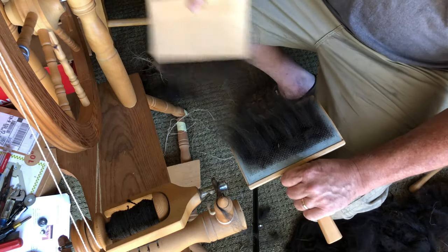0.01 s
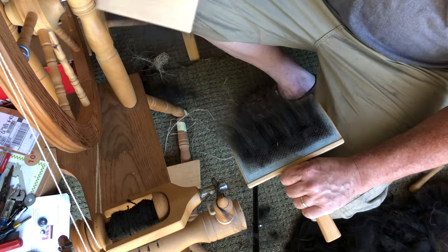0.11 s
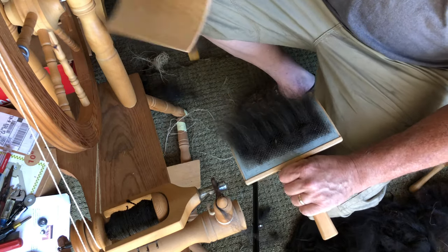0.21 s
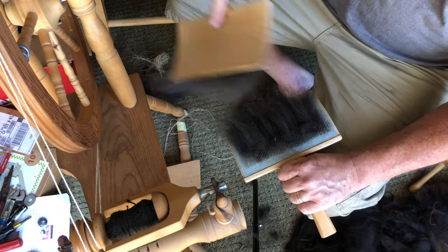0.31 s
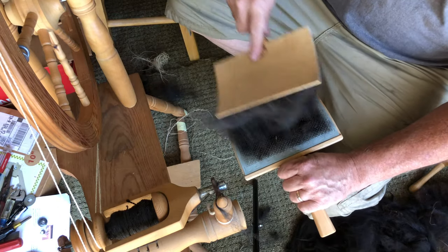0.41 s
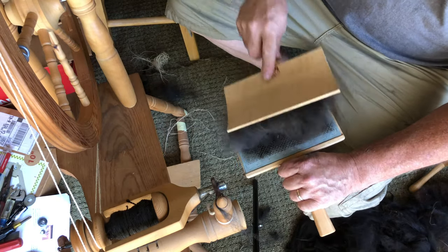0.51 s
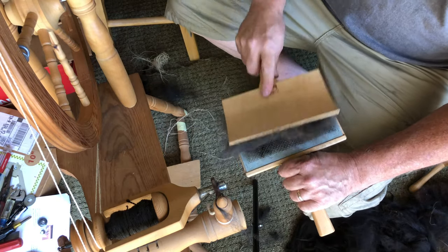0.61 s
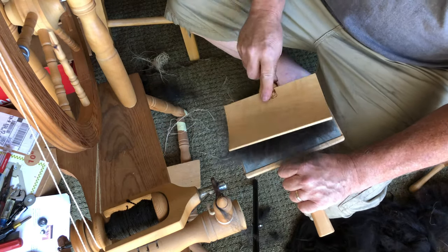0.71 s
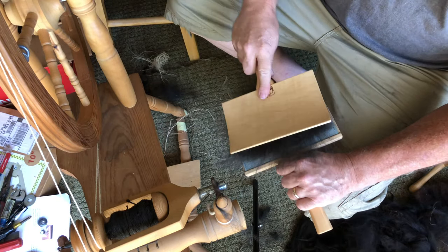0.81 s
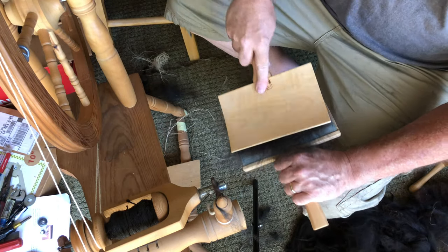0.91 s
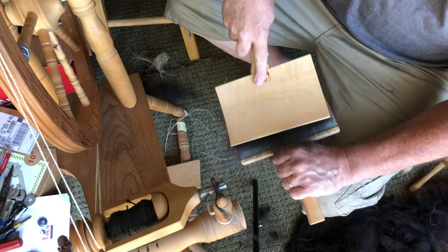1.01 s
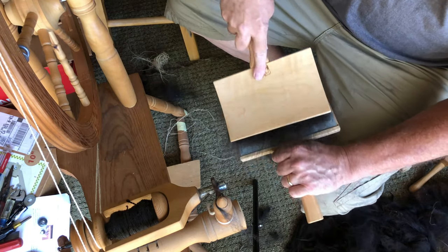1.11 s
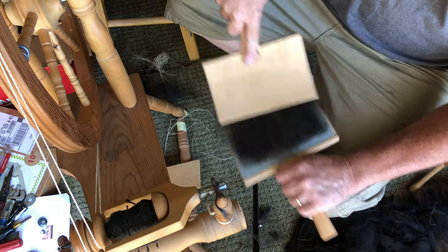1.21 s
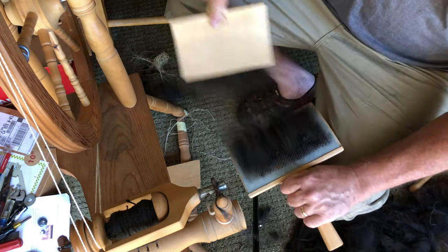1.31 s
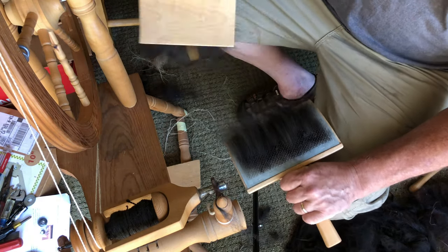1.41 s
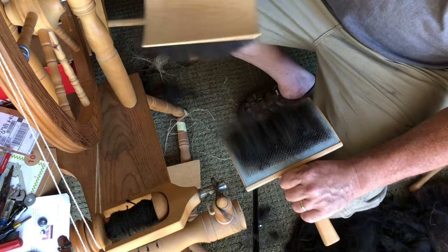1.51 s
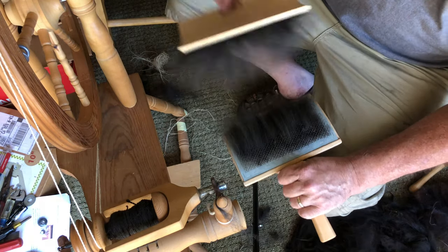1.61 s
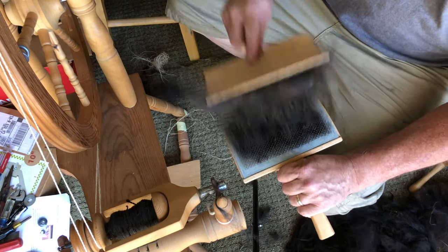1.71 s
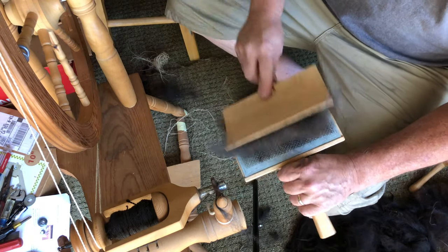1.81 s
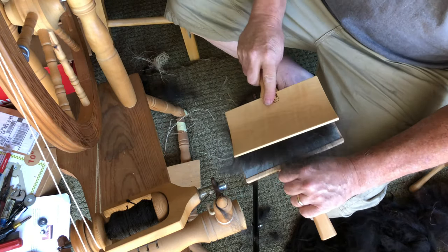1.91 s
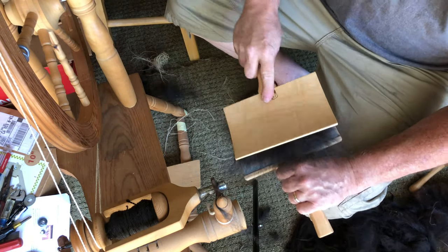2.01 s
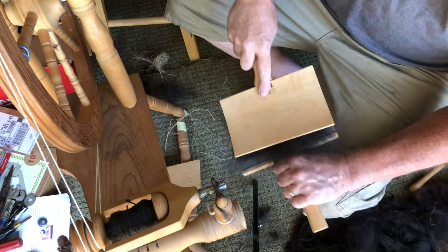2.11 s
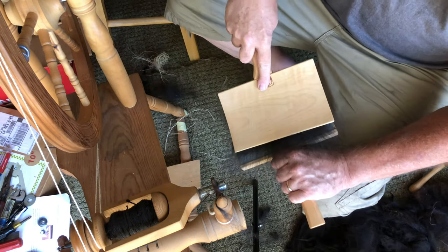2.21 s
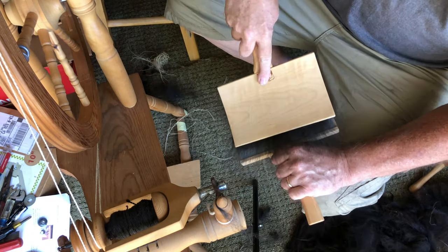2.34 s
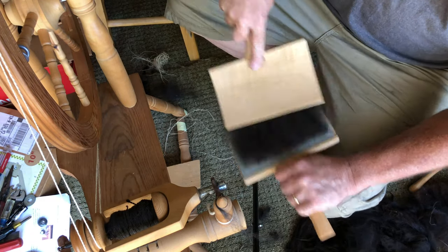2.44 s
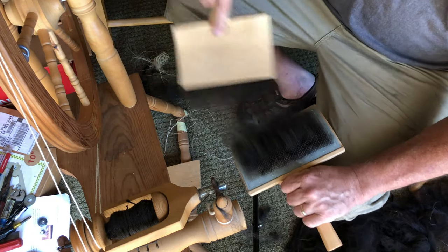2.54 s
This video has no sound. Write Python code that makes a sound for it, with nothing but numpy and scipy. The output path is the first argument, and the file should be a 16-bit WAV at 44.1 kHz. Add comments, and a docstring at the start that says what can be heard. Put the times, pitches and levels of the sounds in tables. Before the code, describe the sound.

Wire teeth scrape through fleece twice, each stroke starting with a wooden clack and ending in a brighter rasp as they slip free. One knock precedes them; close and dry in a small room with faint hum.

```python
"""Two strokes of wooden hand cards combing wool: wire teeth drag through the fleece as clumped scratch noise,
then slip off the edge with a brighter rasp. Each landing is a clack: noise bursts that excite
the damped modes of a wooden paddle, plus wire ticks. Before the first stroke a hard contact knocks wood
into modal ringing; half-sine thuds add weight, and filtered noise gives a faint swish between the strokes.
All sounds close by in a small room of decaying-noise reflections, over steady air noise and a low hum."""
import sys
import numpy as np
from scipy import signal
from scipy.fft import rfft, irfft
from scipy.io import wavfile
from scipy.ndimage import uniform_filter1d

SR = 44100
rng = np.random.default_rng(int(sys.argv[2]) if len(sys.argv) > 2 else 0)


def generate_wav(sig):
    """Save sig (samples, or channels by samples) to the path in sys.argv[1] as 16-bit PCM at SR."""
    pcm = np.round(np.clip(np.atleast_2d(sig).T, -1, 1) * 32767).astype(np.int16)
    wavfile.write(sys.argv[1], SR, pcm)


N = 114660
TIME = np.arange(N) / SR


def amp(db):
    """Level law: converts decibels to an amplitude gain."""
    return 10 ** (np.asarray(db) / 20)


def unit(x):
    """Power normalisation: scales to an rms of one."""
    return x / np.sqrt(np.mean(x ** 2) + 1e-20)


def read(points, hz):
    """Logarithmic pitch scale: interpolates a table along log frequency."""
    f, value = np.transpose(points)
    return np.interp(np.log(hz + 1), np.log(f), value)


def add(mix, s, sound):
    """Superposition: mixes a sound in at time s."""
    part = mix[round(s * SR):][:len(sound)]
    part += sound[:len(part)]


def colour(x, points, size=4096):
    """Minimum phase: a causal filter of unit energy derived from its magnitude spectrum."""
    hz = abs(np.fft.fftfreq(size, 1 / SR))
    log_gain = np.log(amp(read(points, hz)))
    # the Hilbert transform of the log gain supplies the phase
    response = np.exp(signal.hilbert(log_gain).conj())
    ring = np.fft.ifft(response).real[:size // 2]
    return signal.oaconvolve(x, ring / np.linalg.norm(ring))[:len(x)]


def burst(fade_s, size=2048, count=4):
    """Impulsive excitation: many tiny contacts as dying noise of unit energy and nearly even spectrum."""
    fade = np.exp(-np.arange(size) / SR / max(fade_s, 1e-4))
    x = rng.standard_normal(size) * fade
    # alternately flatten the spectrum and restore the decay
    for _ in range(count):
        spectrum = rfft(x)
        flat = irfft(spectrum / (abs(spectrum) + 1e-9))
        x = flat * np.sqrt(fade)
    return x / np.linalg.norm(x)


# Spectrum of the air noise. Each row: frequency in Hz, relative level in dB.
AIR_SPECTRUM = [(20, -21), (55, -6.5), (160, 1), (250, -5.5), (400, -10), (1000, -18), (1800, -21),
                (2600, -23), (4500, -24.5), (7000, -31), (16000, -40)]
AIR_DB, HUM_DB = -63.5, -67  # rms levels
HUM_HZ, HUM_WIDTH_HZ = 98.5, 3  # centre, and offset at which the hum's gain halves


def room_tone():
    """Stationary noise: shaped air noise, and a narrow band whose beating makes the hum waver."""
    hz = np.fft.rfftfreq(N, 1 / SR)
    resonance = 1 / (1 + ((hz - HUM_HZ) / HUM_WIDTH_HZ) ** 2)
    hum = irfft(rfft(rng.standard_normal(N)) * resonance, N)
    air = irfft(rfft(rng.standard_normal(N)) * amp(read(AIR_SPECTRUM, hz)), N)
    return amp(AIR_DB) * unit(air) + amp(HUM_DB) * unit(hum)


# Reverberation of the small room. Each row: frequency in Hz, 60 dB decay time in s.
ROOM_DECAY = [(150, 0.72), (500, 0.45), (1300, 0.56), (3000, 0.53), (7000, 0.35), (14000, 0.26)]


def room(x, wet_db, first_s=0.0046):
    """Diffuse reverberation: adds reflections as noise decaying at its own rate in each band."""
    hz, t, bands = signal.stft(rng.standard_normal(SR), SR, nperseg=256)
    decay = amp(-60 * t / read(ROOM_DECAY, hz)[:, None])
    tail = signal.istft(bands * decay, SR, nperseg=256)[1]
    # no reflection returns before first_s
    tail = tail * (np.arange(len(tail)) / SR > first_s)
    return x + amp(wet_db) * signal.fftconvolve(x, tail / np.linalg.norm(tail))[:N]


BRUSH_WET_DB = -14.5  # reflections of all brushing sounds


def teeth(strokes, spectrum, per_s, spread_db, rub_db, clump_db, clump_s=.005, scratch_s=0.00049):
    """Stick-slip friction: random scratches of wire teeth in clumps, over the soft rub of the fibres."""
    level = sum(amp(np.interp(TIME, *np.transpose(curve), left=-200, right=-200)) for curve in strokes)
    # random flicks, per_s a second on average, of unequal strength
    strength = amp(spread_db * np.minimum(rng.exponential(1, N), 4))
    flicks = (rng.random(N) < per_s / SR) * strength
    # the powers of overlapping scratches add
    power = signal.lfilter([1], [1, -np.exp(-2 / (scratch_s * SR))], flicks ** 2)
    scratches = np.sqrt(power) * rng.standard_normal(N)
    slow_noise = uniform_filter1d(rng.standard_normal(N), max(round(clump_s * SR), 1))
    clumps = amp(clump_db * unit(slow_noise))
    rub = amp(rub_db) * rng.standard_normal(N)
    drive = unit((unit(scratches) + rub) * clumps)
    return room(colour(drive * level, spectrum), BRUSH_WET_DB)


# Faint swish as the card comes down again, one curve. Each row: time in s, level in dB.
SWISH_LEVEL = [
    [(1.59, -85), (1.66, -72), (1.76, -83), (1.79, -88)],
]
# Spectrum of the swish. Each row: frequency in Hz, relative level in dB.
SWISH_SPECTRUM = [(800, -27), (9000, 5), (16000, -2)]


def swish():
    """Broadband noise: dense flicks under a strong rub merge into a faint, bright swish."""
    return teeth(SWISH_LEVEL, SWISH_SPECTRUM, per_s=5000, spread_db=2, rub_db=4, clump_db=3)


# Low thuds under the knock and the second landing.
# Each row: start in s, frequency in Hz, level in dB, length in s.
THUDS = [(0.228, 88, -45, 0.027), (0.227, 239.3, -32.5, 0.0158), (1.9188, 205, -33.5, .014), ]


def thump(wet_db=-12):
    """Low-frequency transient: a few half-sine-shaped cycles as the weight of the card comes to bear."""
    out = np.zeros(N)
    for s, hz, db, length in THUDS:
        t = np.arange(0, length, 1 / SR)
        swell = np.sin(np.pi * t / length)
        add(out, s, amp(db) * swell * np.sin(2 * np.pi * hz * t))
    return room(out, wet_db)


# Contacts of the wooden knock. Each row: start in s, relative level in dB.
KNOCK_CONTACTS = [(0.2245, -4.5), (0.2256, -0.5), (0.2334, -15), (0.2380, -14.5), (0.2439, -16)]
# Spectrum of the contacts. Each row: frequency in Hz, relative level in dB.
KNOCK_SPECTRUM = [(50, -26), (200, -5.5), (420, -10), (640, 0.5), (1100, -2.5), (1600, -6), (2100, -7.5),
                  (4000, -14.5), (7000, -13), (10000, -19.5), (16000, -31)]
# Modes of the knocked wood. Each row: frequency in Hz, relative level in dB, 60 dB decay time in s.
WOOD_MODES = [(171.3, -2.5, 0.35), (631, -11, 0.18), (662, 7, .12), (741, -3, 0.17), (1283, -12, 0.6),
              (1360, 1, 0.22), (1505, -18.5, 0.26), (1835, -5.5, 0.062), (2010, -30.5, 1),
              (2560, -11.5, 0.19), (3220, 2, 0.13), (3989, -24, .26)]
KNOCK_DB, KNOCK_FADE_S, KNOCK_WET_DB = 2, 0.0022, -11  # contact gain, burst fade setting, reflections
WOOD_DB = -36.5  # gain of the ringing


def knock(chatter_db=-11, chatter_s=.021, release_s=0.0044):
    """Modal excitation: a hard contact and brief chatter, with the decaying modes of the wood."""
    hits, ring, t = np.zeros(N), np.zeros(N), TIME[:SR]
    for s, db in KNOCK_CONTACTS:
        add(hits, s, amp(db) * burst(KNOCK_FADE_S))
    start = KNOCK_CONTACTS[1][0]  # the strongest contact
    # chatter holds for chatter_s, then dies away
    hold = np.exp(-np.maximum(t - chatter_s, 0) / release_s)
    chatter = signal.lfilter([1], [1, -.7], rng.standard_normal(SR)) * hold
    add(hits, start, amp(chatter_db) * chatter / np.linalg.norm(chatter))
    for hz, db, t60 in WOOD_MODES:
        mode = np.sin(2 * np.pi * (hz * t + rng.random()))
        add(ring, start, amp(db - 60 * t / t60) * mode)
    contacts = amp(KNOCK_DB) * colour(hits, KNOCK_SPECTRUM)
    return room(contacts, KNOCK_WET_DB) + amp(WOOD_DB) * ring


# Modes of the card's paddle. Each row: frequency in Hz, relative level in dB, 60 dB decay time in s.
PADDLE_MODES = [(504, -9.5, 0.061), (998, 0.5, 0.022), (1220, 3.5, 0.025), (1477, -1, .018),
                (1700, 2, 0.017), (1963, -4, 0.02), (2580, -5, 0.011)]


def paddle(x, low_hz=850):
    """Damped resonance: the hand-held wooden paddle rings briefly and radiates little bass."""
    t = TIME[:4096]
    ring = np.zeros(len(t))
    for k, (hz, db, t60) in enumerate(PADDLE_MODES):
        # neighbouring modes have opposite sign
        ring += (-1) ** k * amp(db - 60 * t / t60) * np.sin(2 * np.pi * hz * t)
    ring = signal.lfilter(*signal.butter(2, low_hz, "high", fs=SR), ring)
    return signal.oaconvolve(x, ring / np.linalg.norm(ring))[:N]


# Card meeting card, and teeth snagging.
# Each row: start in s, relative wood level in dB, relative wire level in dB, burst fade setting in s.
CLACK_CONTACTS = [(0.7178, -6, -19.5, 0.0011), (0.72, 1.5, -6.5, 0.0022), (0.7219, -1, -6, 0.0018),
                  (0.7257, -14.5, -13, 0.0012), (0.7819, -8.5, -11.5, 0.0023), (0.8508, -19.5, -12, 0.0037),
                  (0.9066, -16, -28, 0.0043), (0.9168, -25, -29, .0015), (1.0128, -21, -23, 0.00086),
                  (1.2077, -25, -26, 0.00057), (1.911, -16, -17, 0.0033), (1.9122, -7.5, -18, 0.0078),
                  (1.9168, -9.5, -17, 0.0047), (1.9270, -5.5, -13.5, 0.0051), (1.938, -19, -19, .004),
                  (1.9555, -10, -20, .0012), (2.0072, -16, -21, .001), (2.1135, -19, -22, .002),
                  (2.1290, -8, -17, .0012), ]
# Spectrum of the wire tick. Each row: frequency in Hz, relative level in dB.
TICK_SPECTRUM = [(100, -14), (350, -1), (3800, -3), (5400, -0.5), (8000, -2), (10000, 0.5), (16000, -14.5)]
CLACK_DB, CLACK_WET_DB = -7.5, -15.5  # overall gain, reflections


def clacks():
    """Impact: bunches of teeth strike or let go together, so the wires tick and the paddle sounds."""
    pushes, ticks = np.zeros(N), np.zeros(N)
    for s, wood_db, wire_db, fade_s in CLACK_CONTACTS:
        add(pushes, s, amp(wood_db) * burst(fade_s / 2))  # the wood is pushed more briefly
        add(ticks, s, amp(wire_db) * burst(fade_s))
    contacts = paddle(pushes) + colour(ticks, TICK_SPECTRUM)
    return room(amp(CLACK_DB) * contacts, CLACK_WET_DB)


# Rasp of the teeth slipping off the edge, one curve per stroke. Each row: time in s, level in dB.
SLIP_LEVEL = [
    [(1.09, -70), (1.16, -54.5), (1.19, -49), (1.235, -46), (1.28, -56.5), (1.32, -62), (1.38, -69),
     (1.41, -104)],
    [(2.33, -81), (2.36, -60), (2.406, -66.5), (2.414, -51.5), (2.47, -46), (2.51, -55.5), (2.55, -62),
     (2.6, -69)],
]
# Spectrum of the slip. Each row: frequency in Hz, relative level in dB.
SLIP_SPECTRUM = [(100, -32), (400, 1.5), (650, -9), (1100, 1.5), (1700, -9), (2150, -3), (3000, -7),
                 (3800, -14.5), (5400, -10.5), (8000, -16.5), (10700, -8.5), (13000, -16), (16000, -22)]


def slip():
    """Frictional release: denser scratches and less rub as the teeth slip off the edge."""
    return teeth(SLIP_LEVEL, SLIP_SPECTRUM, per_s=3500, spread_db=4.0, rub_db=-4, clump_db=1.64)


# Force on the dragging teeth, one curve per stroke. Each row: time in s, level in dB.
DRAG_LEVEL = [
    [(0.723, -44), (0.736, -53), (0.83, -55), (0.90, -47.5), (1.03, -51.5), (1.10, -55), (1.16, -56.5),
     (1.25, -54.5), (1.36, -79)],
    [(1.908, -49), (1.93, -47.5), (2.02, -51.5), (2.14, -48), (2.23, -51), (2.26, -57), (2.32, -60),
     (2.38, -56.5), (2.45, -73)],
]
# Spectrum of the drag. Each row: frequency in Hz, relative level in dB.
DRAG_SPECTRUM = [(100, -29), (380, -3.5), (620, -8.5), (850, -4), (1080, 0.5), (1450, -2), (2000, -4.5),
                 (2900, -4.5), (3700, -11.5), (5300, -10.5), (8000, -18), (10300, -12), (13000, -24),
                 (16000, -23)]


def drag():
    """Sliding friction: sparser, more strongly clumped scratches as the teeth drag through the fleece."""
    return teeth(DRAG_LEVEL, DRAG_SPECTRUM, per_s=1100, spread_db=3, rub_db=-1, clump_db=2.5)


def scene():
    """Superposition: the room tone, the knock and the two strokes in one channel."""
    contacts = thump() + knock() + clacks()
    brushing = swish() + slip() + drag()
    return (room_tone() + contacts + brushing)[None]


CUT_HZ = 16000


def record(dry):
    """Band limitation: a linear-phase low-pass filter leaves almost nothing above CUT_HZ."""
    low_pass = signal.firwin(511, CUT_HZ, window=("kaiser", 9), fs=SR)
    return signal.oaconvolve(dry, low_pass[None], "same")


dry = scene()
out = record(dry)
generate_wav(out)
```